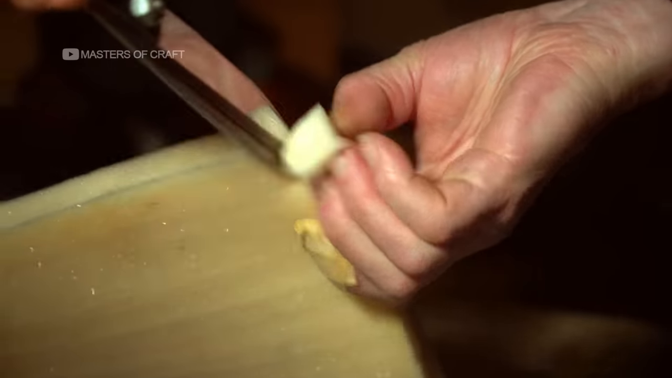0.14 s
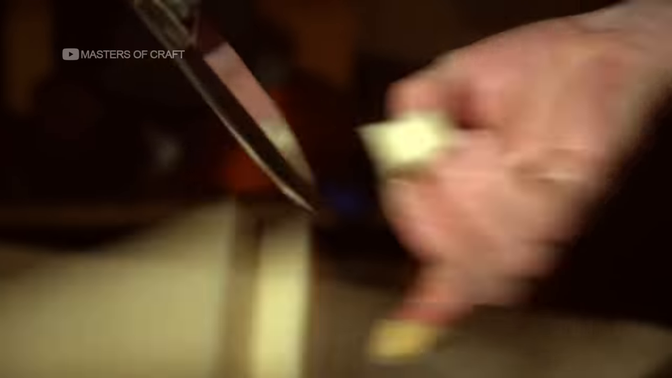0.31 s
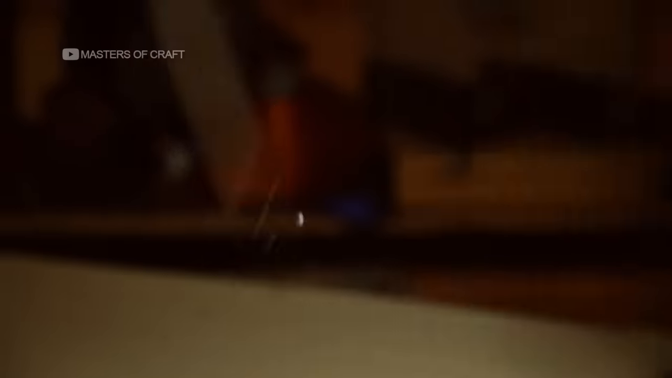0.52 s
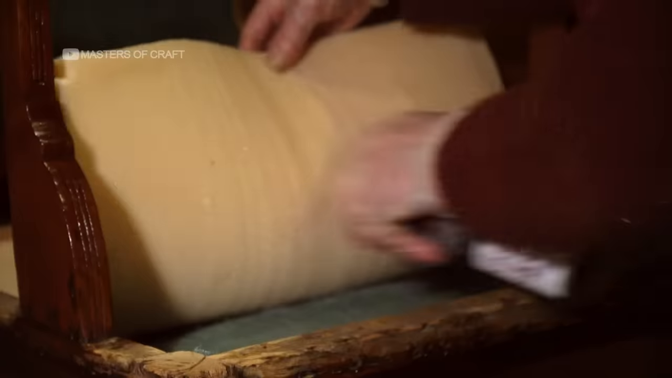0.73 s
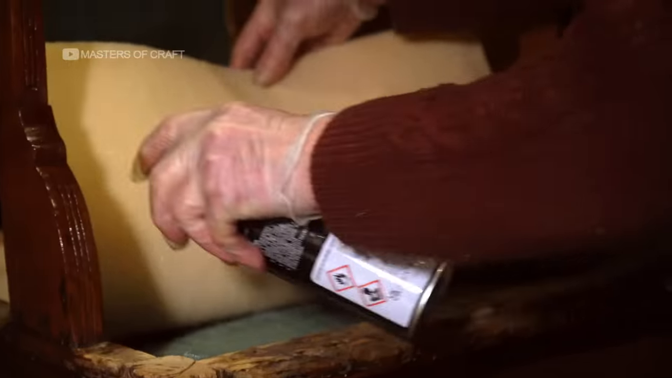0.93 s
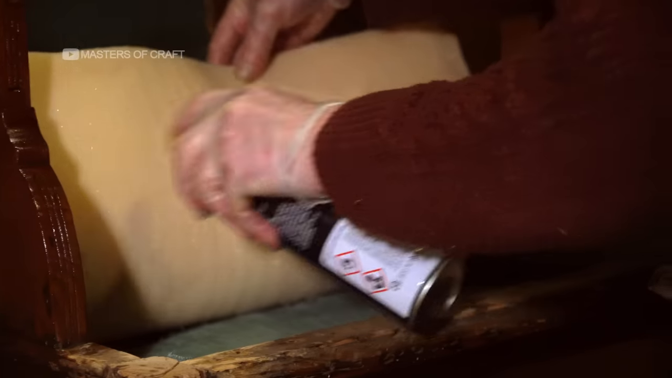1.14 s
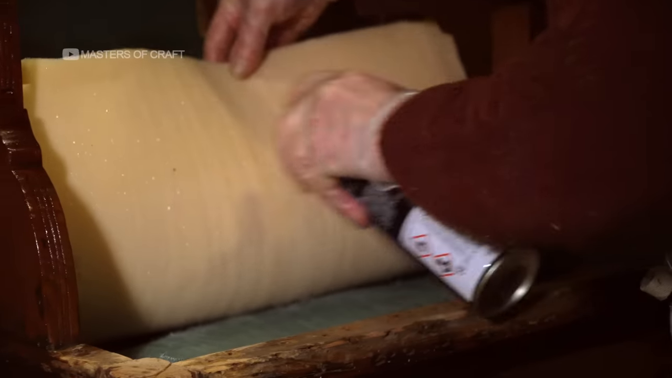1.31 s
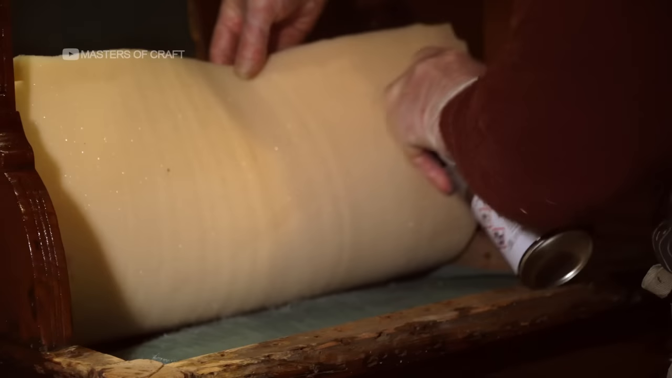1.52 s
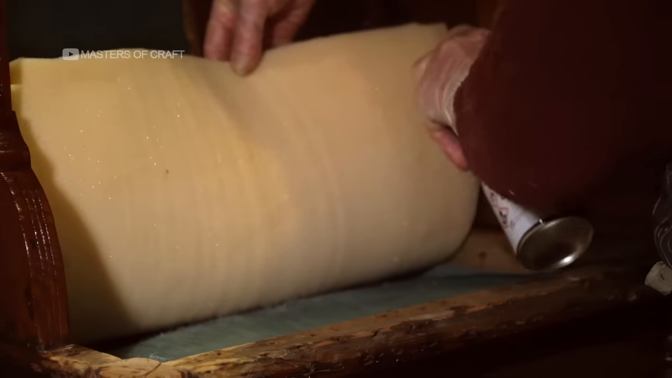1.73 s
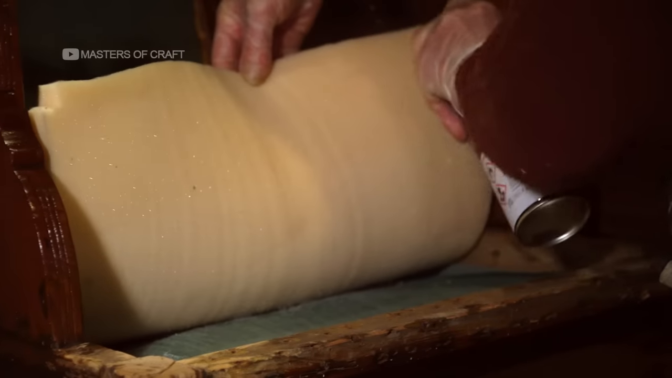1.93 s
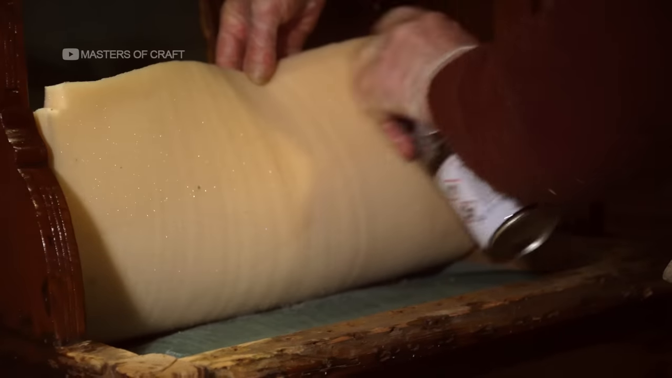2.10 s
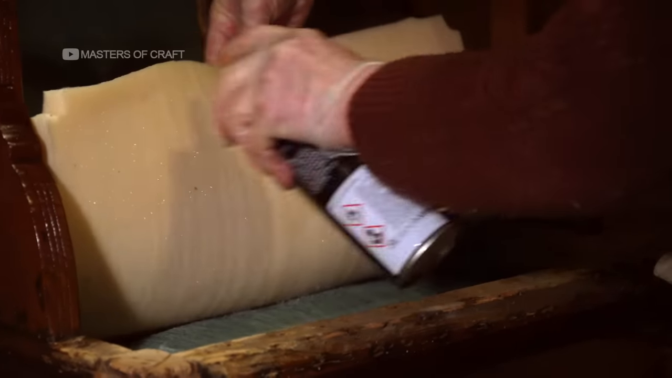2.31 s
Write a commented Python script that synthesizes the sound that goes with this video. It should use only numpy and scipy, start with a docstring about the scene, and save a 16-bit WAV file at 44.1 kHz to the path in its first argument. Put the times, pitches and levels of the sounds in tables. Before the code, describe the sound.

An aerosol can hisses in two long bursts over foam, after one crisp scissor snip

```python
"""Scissors shear through foam and snap shut, close to one microphone in a quiet upholstery workshop:
gritty noise and a blow drive blade modes. After some ticks, rustle and a faint whistle a spray can hisses
twice over the foam, as shaped noise with narrow rings and echoes. Knocks drive the modes of a wooden frame;
a low thump, room tone, a blurred hum and a throb below hearing are added."""
import sys
import numpy as np
from scipy import signal
from scipy.fft import rfft, irfft
from scipy.io import wavfile
from scipy.ndimage import uniform_filter1d, map_coordinates

SR = 44100
rng = np.random.default_rng(int(sys.argv[2]) if len(sys.argv) > 2 else 0)


def wav_out(sig):
    """Save sig, one row per channel (or a flat mono array), as 16-bit PCM at SR to the path in sys.argv[1]."""
    wavfile.write(sys.argv[1], SR, np.round(np.clip(np.atleast_2d(sig).T, -1, 1) * 32767).astype(np.int16))


def field_ratio(decibels):
    """Amplitude ratio for a level in dB (20 dB per decade); scalars and array-likes work."""
    return 10 ** (np.asarray(decibels, dtype=float) / 20)


N = 110250
T = np.arange(N) / SR


def unit(x):
    """Scale to rms 1."""
    return x / np.sqrt(np.mean(x ** 2))


def noise():
    """White Gaussian noise."""
    return rng.standard_normal(N)


def grit(spread_db):
    """Noise whose samples differ widely in size."""
    return unit(noise() * field_ratio(spread_db * rng.exponential(size=N)))


def walk(rate_hz):
    """Random levels held 1 / rate_hz s and slewed twice."""
    hold = int(SR / rate_hz)
    steps = np.repeat(rng.standard_normal(N // hold + 1), hold)
    return 1.39 * uniform_filter1d(uniform_filter1d(steps, hold), hold)[:N]


def curve(table, col, off=None):
    """One column of a time table, sample by sample; off holds outside the table."""
    rows = np.array(table)
    return np.interp(T, rows[:, 0], rows[:, col], off, off)


def decay(at_s, t60_s):
    """Sudden start, exponential fall."""
    return (T >= at_s) * np.exp(-np.log(1000) * np.maximum(T - at_s, 0) / t60_s)


def colour(x, points):
    """Weight the spectrum of x by (Hz, dB) points, rms 1."""
    hz, db = np.array(points).T
    f = np.maximum(np.arange(N // 2 + 1) * SR / N, 1)
    return unit(irfft(rfft(x) * field_ratio(np.interp(np.log(f), np.log(hz), db)), N))


def band(x, lo_hz, hi_hz, order=2):
    """Butterworth band-pass."""
    sos = signal.butter(order, [lo_hz, min(hi_hz, .45 * SR)], "band", fs=SR, output="sos")
    return signal.sosfilt(sos, x)


def narrow(centre_hz, width_hz):
    """Narrow-band noise, rms 1."""
    return unit(band(noise(), centre_hz - width_hz / 2, centre_hz + width_hz / 2, order=1))


def tone(hz):
    """Sine that follows a frequency curve."""
    return np.sin(2 * np.pi * np.cumsum(hz) / SR)


def ring(x, modes):
    """Drive a table of decaying modes; neighbours swing in opposite sense."""
    out = 0
    for k, (hz, db, t60_s) in enumerate(modes):
        pole = np.exp(2j * np.pi * hz / SR - np.log(1000) / (t60_s * SR))
        out = out + (-1) ** k * field_ratio(db) * signal.lfilter([1], [1, -pole], x).imag
    return out


def scissors():
    """Gritty rubbing swells in the blade modes, then the blades clap together and chatter."""
    # modes of the blades: (frequency [Hz], level [dB], t60 [s])
    blades = [(2135, -6, .022), (3525, -1.5, .018), (4955, 1, .026), (5350, -4, .01), (5650, 3, .017),
              (6325, -1, .03), (7190, -3, .016), (7920, -2, .018), (8300, -4, .018), (8900, -2, .014),
              (9660, -6, .018), (10430, -2, .02), (10815, -2, .028), (12400, 1, .016), (12950, -2, .01),
              (14400, -8, .012)]
    # spectrum of rubbing hiss and snap: (frequency [Hz], density [dB per Hz])
    crack_spectrum = [(100, -24), (400, -14.5), (900, -26.5), (2000, -8.5), (2700, -15), (3600, -9),
                      (5300, -2.5), (9000, -1), (13000, 0), (13800, -9), (15800, -10.5)]
    # blades rubbing as they close: (time [s], ring level [dB], hiss level [dB])
    shear_levels = [(.09, -97, -94), (.098, -74, -82.5), (.116, -88, -87), (.122, -93.5, -98),
                    (.128, -69, -81.5), (.145, -77.5, -81.5), (.152, -78, -85.5), (.166, -60.5, -68.5),
                    (.183, -53.5, -59), (.195, -53.5, -55.5), (.204, -50, -54.5), (.207, -91, -88.5)]
    snap_s, bounce_s = .2057, .2102  # the blades meet once more at bounce_s

    rub = grit(3.)
    pressed_blades = np.array(blades) * [1, 1, .75]  # pressed blades ring shorter
    rub_ring = unit(ring(band(rub, 2200, 5600, order=1), pressed_blades))  # and duller
    shear = rub_ring * field_ratio(curve(shear_levels, 1, off=-200))
    shear = shear + colour(rub, crack_spectrum) * field_ratio(curve(shear_levels, 2, off=-200))

    blow = field_ratio(-18.5) * grit(5.45) * decay(snap_s, t60_s=.008)  # chatter
    blow[int(snap_s * SR)] += 1
    blow[int(bounce_s * SR)] += field_ratio(-12)
    crack = field_ratio(-23.5) * colour(noise(), crack_spectrum) * decay(snap_s, t60_s=.045)
    return shear + field_ratio(-22.5) * ring(blow, blades) + crack


def spray():
    """Turbulent jet in three ranges, with nozzle and can resonances; the foam adds faint moving echoes."""
    # the jet, one table a press: (time [s], level [dB], then relative gains of
    # lows [dB], nozzle ring [dB], top [dB], can ring [dB])
    presses = [
        [(0.895, -104, -6, -11, 7, -7), (0.921, -61.5, -29, -9, 4, -32), (0.935, -49, -16.5, -9, 2.5, -36),
         (0.981, -49, -10, -18, 2, -12.5), (1.041, -46.5, -13, -17.5, 2.5, -46),
         (1.355, -47.5, -14.5, -11, -1.5, -27), (1.495, -48.5, -15, -17, -3.5, -14),
         (1.537, -51, -3.5, -16, 0, -5.5), (1.587, -52, -15.5, -9.5, -5.5, -19),
         (1.675, -87.5, 10, -13, -10, 13), (1.72, -94, 7.5, 4.5, -5, 6)],
        [(1.77, -81.5, 10.5, -1, -18, -9), (1.796, -54.5, -28, -7, -5, -16), (1.818, -49, -11, -14, -7, -26.5),
         (1.94, -50.5, -9.5, -14.5, -0.5, -7), (2.062, -49.5, -14, -15, -6, -18),
         (2.076, -48, -6, -17, -13, -23), (2.102, -48.5, -12.5, -11.5, -4, -14),
         (2.226, -49, -11.5, -13, -4, -12), (2.296, -49, -11.5, -13, -2, -36), (2.35, -49.5, -8, -18.5, 1, -20),
         (2.5, -49.5, -10.5, -8.5, 1.5, -38)],
    ]
    # jet spectrum: (frequency [Hz], density [dB per Hz])
    jet_spectrum = [(150, -54), (260, -2.5), (320, -3), (1200, 2.5), (1900, 3), (2450, 0), (2620, -2.5),
                    (3800, 1.5), (7000, -0.5), (10000, -1), (15700, -5.5)]
    # centre of the nozzle ring as the can tilts: (time [s], frequency [Hz])
    nozzle_centre = [(.92, 2250), (1.15, 2350), (1.3, 2196), (1.6, 2300), (1.95, 2397), (2.1, 2100),
                     (2.25, 1987), (2.35, 2354), (2.5, 1872)]
    # steady narrow rings in the jet: (frequency [Hz], relative level [dB])
    valve_rings = [(2355, -19), (3242, -19)]
    # change of colour with the can turned for the second press: (frequency [Hz], gain [dB])
    turned = [(3100, -1), (4100, 4), (4700, -1), (5300, 0.5), (6800, 2.5)]
    # the foam mirrors the jet: (delay [s], level [dB], drift of log delay [1])
    foam_echoes = [(.00043, -17, .03), (.0013, -15, .2)]
    lows_top_hz, top_from_hz, nozzle_width_hz = 1400, 12840, 220
    flicker_db = .6

    f = np.arange(N // 2 + 1) * SR / N
    low = 1 / (1 + (f / lows_top_hz) ** 4)
    high = 1 - 1 / (1 + (f / top_from_hz) ** 6)

    def part(power_share):
        """Spitting jet noise in one range, rms 1."""
        return unit(irfft(rfft(colour(grit(.77), jet_spectrum)) * np.sqrt(power_share), N))

    sway = narrow(nozzle_width_hz / 4, nozzle_width_hz / 2.1)
    nozzle = unit(sway * tone(curve(nozzle_centre, 1)))
    can = narrow(446, width_hz=70)
    layers = [part(low), nozzle, part(high), can]
    middle = field_ratio(-3.0) * part(np.clip(1 - low - high, 0, 1))
    valve = sum(field_ratio(db) * narrow(hz, width_hz=23) for hz, db in valve_rings)

    jet = 0
    for press, body in zip(presses, [middle, field_ratio(-3.5) * colour(middle, turned)]):
        mix = body + valve
        for k, layer in enumerate(layers):
            mix = mix + layer * field_ratio(curve(press, k + 2) + flicker_db * walk(41.06))
        jet = jet + mix * field_ratio(curve(press, 1, off=-200) + flicker_db * walk(12.21))

    out = jet
    for delay_s, db, drift in foam_echoes:
        read_s = T - delay_s * np.exp(drift * walk(2))
        out = out + field_ratio(db) * map_coordinates(jet, [read_s * SR], mode="mirror")
    return out


def knocks():
    """Half-sine pushes and a dying rattle drive the frame modes."""
    # modes of the wooden frame: (frequency [Hz], level [dB], t60 [s])
    frame_modes = [(80, -7.5, 0.25), (144.3, -7.5, 0.49), (188.3, -10, 0.48), (253, -0.5, 0.15),
                   (293.7, 6, 0.095), (394, -10, 0.079), (460, -4, 0.081), (565, -7, 0.056),
                   (930, -11, 0.046), (1300, -23, 0.048)]
    # pushes on the frame: (time [s], drive level [dB], length [s])
    pushes = [(1.526, -43, 0.0006), (1.5325, -40.5, 0.0011), (1.5495, -42.5, 0.0019),
              (1.579, -41.5, 0.0046), (1.601, -50.5, 0.0021), (1.624, -42.5, 0.0037)]
    drive = 0
    for at_s, db, length_s in pushes:
        half_sine = np.sin(np.pi * np.clip((T - at_s) / length_s, 0, 1))
        drive = drive + field_ratio(db) * half_sine / (length_s * SR)
    # loose wood shakes on after the first knock
    rattle = field_ratio(-71.5) * grit(4.65) * decay(pushes[0][0], t60_s=.32)
    return band(ring(drive + rattle, frame_modes), 55, 8000)


def ticks():
    """Small ticks: band noise that starts suddenly and decays."""
    # (time [s], rms level at the start [dB], centre [Hz])
    tick_table = [(0.291, -55.5, 2400), (0.511, -69.5, 1480), (0.717, -65, 2490), (1.656, -58.5, 880),
                  (2.079, -54, 825)]
    out = 0
    for at_s, db, hz in tick_table:
        burst = unit(band(noise(), hz / 1.5, hz * 1.23, order=1))
        out = out + field_ratio(db) * burst * decay(at_s, t60_s=.025)
    return out


def rustle():
    """Foam and sleeve rustle: gritty, wavering lows and smooth treble noise."""
    # (time [s], level of the lows [dB], level of the treble [dB])
    rustle_levels = [(0.26, -68, -63), (0.326, -77, -76.5), (0.498, -71.5, -78), (0.652, -85.5, -76.5),
                     (0.718, -75, -76), (0.734, -96, -97), (0.78, -78.5, -83), (0.8, -87.5, -94)]
    lows = unit(band(grit(3.0), 250, 1270, order=1))
    treble = unit(band(noise(), 2700, 18000))
    out = lows * field_ratio(curve(rustle_levels, 1, off=-200) + 2 * walk(23.1))
    return out + treble * field_ratio(curve(rustle_levels, 2, off=-200))


def whistle():
    """Faint falling whistle: a sine modulated by low-frequency noise, so breathy."""
    # (time [s], frequency [Hz], level [dB])
    whistle_path = [(.575, 4250, -86), (.6, 4150, -78), (.63, 3900, -80), (.655, 3550, -77),
                    (.69, 3170, -77), (.72, 3050, -97)]
    breath = unit(band(noise(), 4.2, 120, order=1))
    return breath * tone(curve(whistle_path, 1)) * field_ratio(curve(whistle_path, 2, off=-200))


def thump():
    """One soft low thump: a cosine with a Gaussian rise and an exponential fall."""
    cycles = (T - 1.034) * 109  # peak time [s], frequency [Hz]
    rise, fall = np.exp(-(cycles / .19) ** 2), np.exp(-cycles.clip(0) / .87)
    return field_ratio(-49.5) * np.cos(2 * np.pi * cycles) * np.where(cycles < 0, rise, fall)


def workshop():
    """Swaying room tone, a blurred low hum that stops and a wavering throb below hearing."""
    # room tone: (frequency [Hz], density [dB per Hz])
    air_spectrum = [(15, -39), (25, -4.5), (82, -12.5), (284, -26), (558, -24), (605, -26.5), (1290, -30),
                    (1440, -31), (2900, -37), (15900, -40)]
    # throb: (time [s], rms level [dB])
    throb_levels = [(0.0, -52), (0.1, -69), (0.31, -54.5), (0.64, -59), (0.83, -69.5), (1.02, -59),
                    (1.4, -67), (1.64, -58), (1.78, -68.5), (2.31, -59), (2.5, -68)]
    hum_hz, hum_end_s, throb_hz = 195, .78, 13.5
    air = field_ratio(-69.5 + .8 * walk(8.2)) * colour(noise(), air_spectrum)
    hum = field_ratio(-76) * unit(band(noise(), hum_hz / 1.25, hum_hz * 1.3)) * (T < hum_end_s)
    throb = np.sin(2 * np.pi * throb_hz * T) * np.sqrt(2) * field_ratio(curve(throb_levels, 1))
    return air + throb + hum


def room(near):
    """Small damped room: convolution with decaying noise of unit energy after a short gap."""
    tail = (noise() * decay(.0054, t60_s=.12))[:SR // 2]
    return field_ratio(-11) * signal.fftconvolve(near, tail / np.sqrt(np.sum(tail ** 2)))[:N]


def scene():
    """All near sources in the room, over the workshop background, alike in two channels."""
    near = scissors() + spray() + knocks() + ticks() + rustle() + whistle() + thump()
    return np.tile(near + room(near) + workshop(), (2, 1))


def roll_off(x):
    """The treble ends steeply here."""
    return signal.sosfilt(signal.butter(12, 16990, fs=SR, output="sos"), x)


def record(dry):
    """One microphone, both channels alike, top cut steeply by an elliptic low-pass."""
    top_hz = 15850
    cut = signal.sosfilt(signal.ellip(10, .2, 70, top_hz, fs=SR, output="sos"), dry)
    return roll_off(cut)


dry = scene()
out = record(dry)
wav_out(out)
```